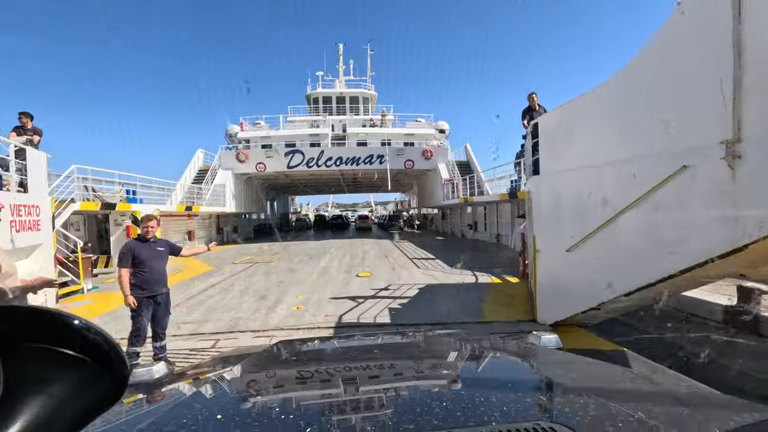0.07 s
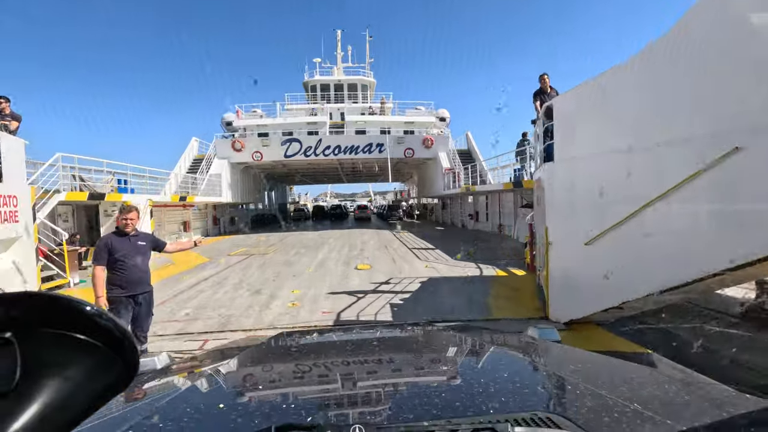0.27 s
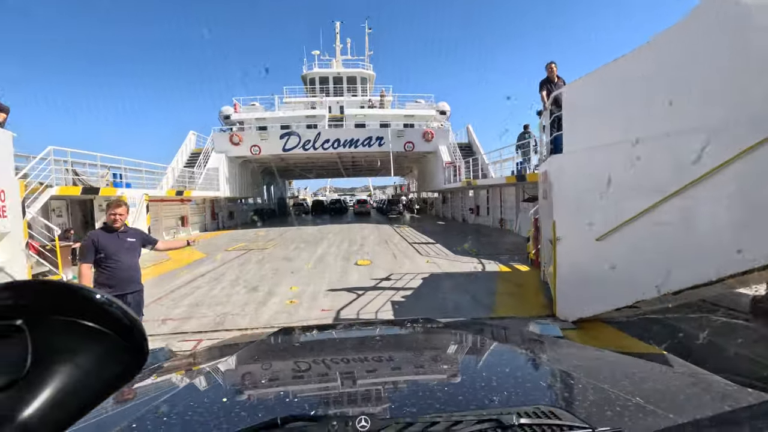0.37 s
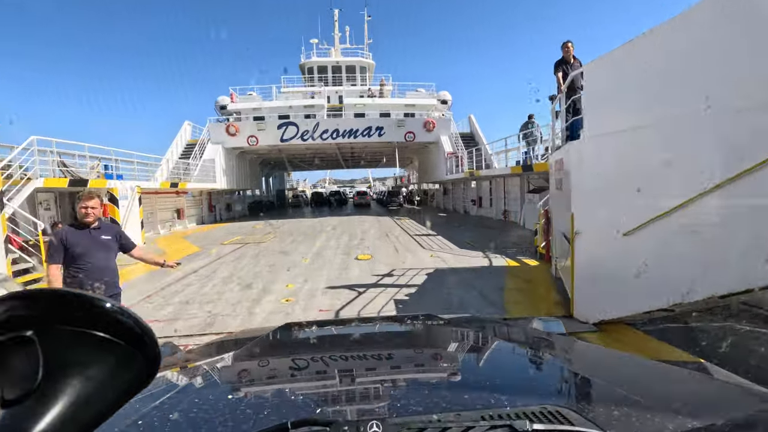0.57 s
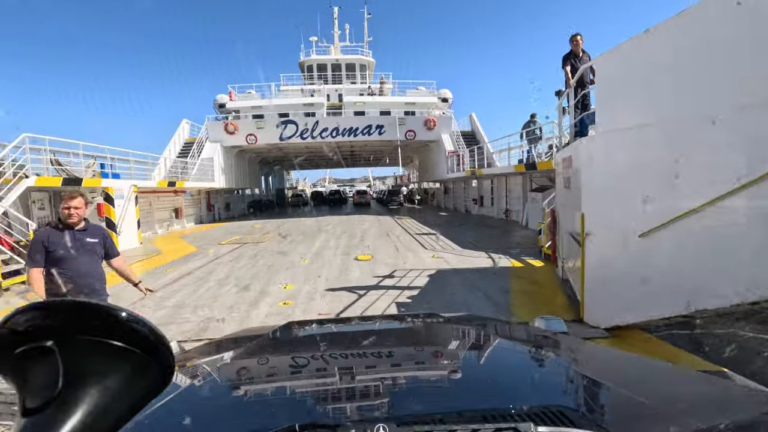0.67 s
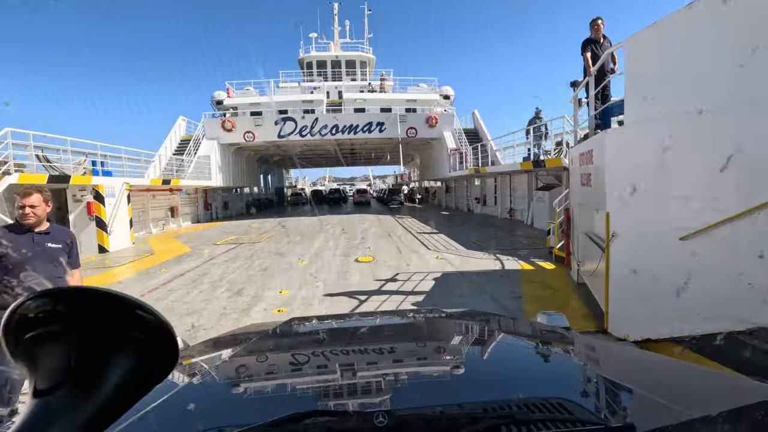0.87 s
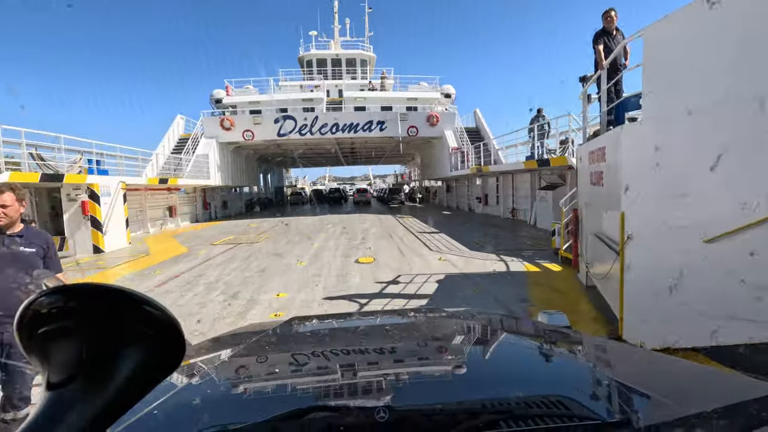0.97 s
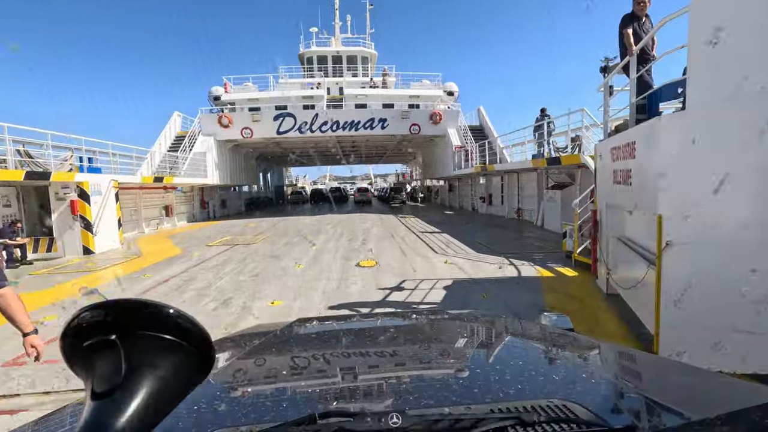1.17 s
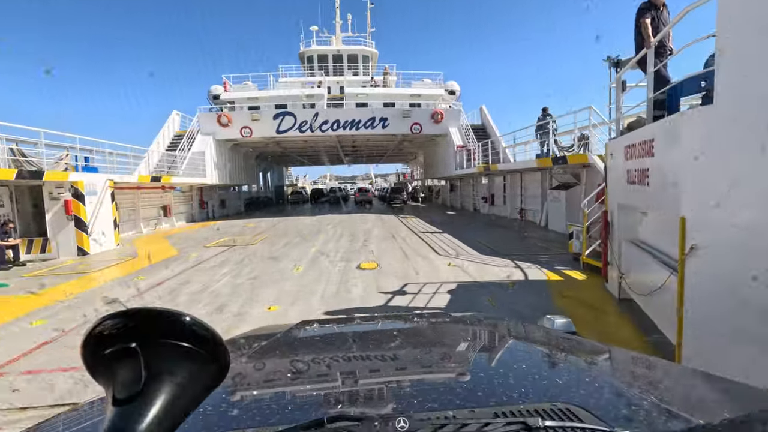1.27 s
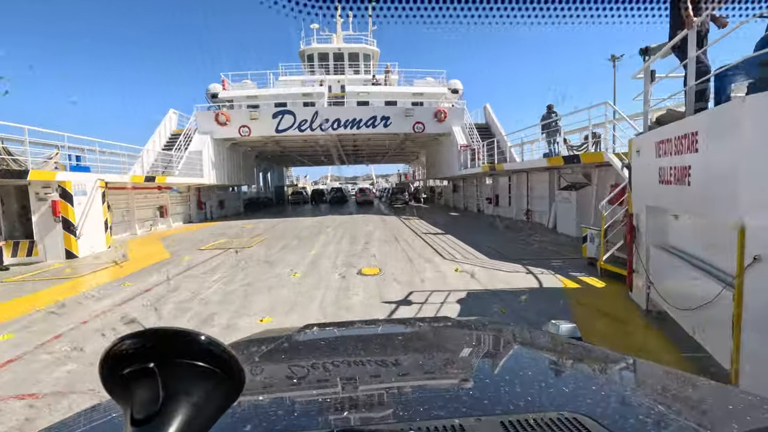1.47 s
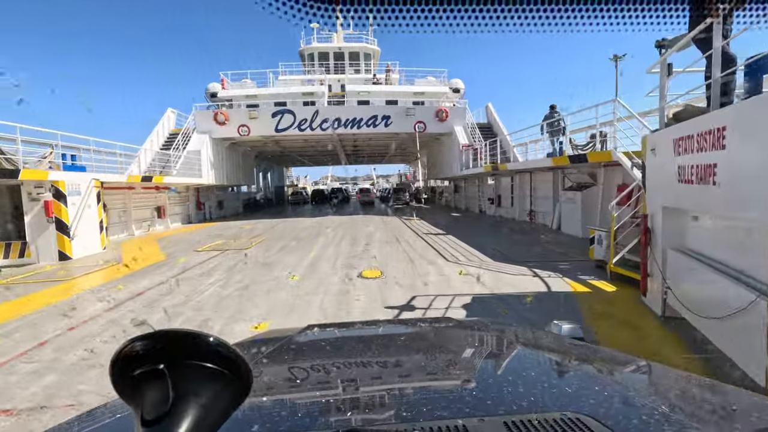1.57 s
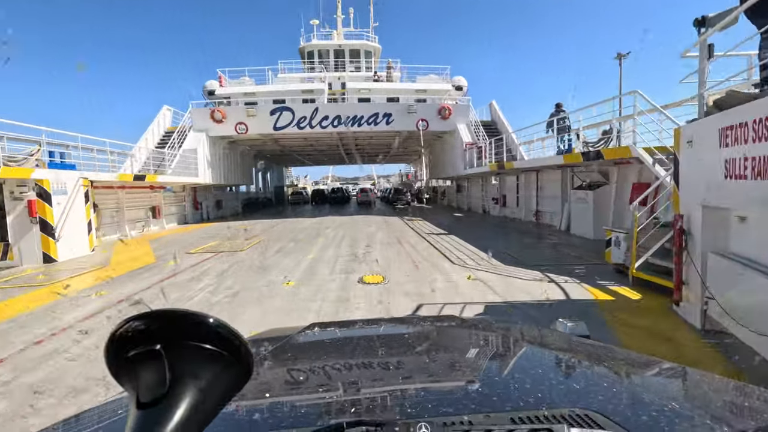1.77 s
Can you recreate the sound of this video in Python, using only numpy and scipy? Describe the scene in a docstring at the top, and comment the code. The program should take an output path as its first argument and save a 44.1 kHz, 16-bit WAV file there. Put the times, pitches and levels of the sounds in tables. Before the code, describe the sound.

Loud metallic bang of a vehicle's tyre on a steel ramp, ringing out above low engine rumble

```python
"""A wheel slams a ferry's steel ramp, which booms and rings: sharp plate modes over dense noise.
A loose flap clanks, the hollow deck drones and small loose parts jingle, all as decaying sounds.
They belong to a big four-wheel-drive crawling aboard, heard from just above its bonnet.
Its engine rumbles throughout as low tones and throbbing noise; its clatter of rough noise,
ticks and squeaks grows as the ferry's steel side wall comes alongside."""
import sys
import numpy as np
from scipy import signal
from scipy.fft import rfft, irfft, next_fast_len
from scipy.io import wavfile
from scipy.ndimage import map_coordinates

SR = 44100
rng = np.random.default_rng(int(sys.argv[2]) if len(sys.argv) > 2 else 0)


def output_pcm(signal):
    """Save a mono or channel-first signal as 16-bit PCM at the path in sys.argv[1].

    Samples are clipped to [-1, 1] before scaling.
    """
    pcm = np.clip(np.atleast_2d(signal).T, -1, 1) * 32767
    wavfile.write(sys.argv[1], SR, np.round(pcm).astype(np.int16))


N = 79380  # samples, 1.8 s


def amp(db):
    """Turn decibels into a gain."""
    return 10 ** (np.asarray(db) / 20)


def unit(x):
    """Scale to an rms of 1."""
    return x / np.sqrt(np.mean(x ** 2) + 1e-20)


def along(points, hz):
    """Read a curve of (Hz, value) points, joined by lines on a log frequency axis."""
    point_hz, values = np.transpose(points)
    return np.interp(np.log(hz + 1), np.log(point_hz + 1), values)


def seconds():
    """Time of every sample."""
    return np.arange(N) / SR


def wobble(rate):
    """A smooth random curve through `rate` random values a second."""
    knots = rng.standard_normal(N // 20)
    return map_coordinates(knots, [seconds() * rate + 2], mode="wrap")


def filtered(x, response):
    """Multiply the spectrum of x by a response that depends on frequency."""
    size = next_fast_len(N + SR // 4)
    hz = np.fft.rfftfreq(size, 1 / SR)
    return irfft(rfft(x, size) * response(hz), size)[:N]


def noise(spectrum):
    """Random noise coloured by a (Hz, dB) curve, at an rms of 1."""
    white = rng.standard_normal(N)
    return unit(filtered(white, lambda hz: amp(along(spectrum, hz))))


def fade(t60):
    """Exponential decay that falls by 60 dB in t60 seconds."""
    return np.exp(-np.log(1000) * seconds() / t60)


def attack(rise_s):
    """A quick rise from 0 towards 1, as a contact takes hold."""
    return 1 - np.exp(-seconds() / rise_s)


def delayed(x, start_s):
    """Make x begin at start_s."""
    return np.pad(x, (max(round(start_s * SR), 0), 0))[:N]


def soften(x, edge_hz, order=2):
    """Low-pass filter: a softer contact loses its treble."""
    sos = signal.butter(order, min(edge_hz, SR / 2 - 1), fs=SR, output="sos")
    return signal.sosfilt(sos, x)


def ring(modes, scatter_db):
    """Decaying modes, each with a new random strength and phase."""
    t, out = seconds(), np.zeros(N)
    for hz, db, t60 in modes:
        level = np.sqrt(2) * amp(db + scatter_db * rng.normal())
        out += level * fade(t60) * np.sin(2 * np.pi * (hz * t + rng.random()))
    return out


RIPPLE_DB, RIPPLE_HZ = 5, 13  # depth and spacing of a plate's weak modes


def weak_modes(count=4000):
    """A plate's irregular fine pattern of resonances, as a (Hz, dB) curve."""
    strength = np.clip(rng.standard_normal(count), -2, 1)
    return np.column_stack([RIPPLE_HZ * np.arange(count), RIPPLE_DB * strength])


def wash(spectrum, decay_times, pattern):
    """Noise for countless plate modes, each frequency band dying at its own speed."""
    steady = unit(filtered(noise(spectrum), lambda hz: amp(along(pattern, hz))))
    hz, t, bands = signal.stft(steady, SR, nperseg=256)
    t60 = along(decay_times, hz)[:, None]
    return signal.istft(bands * np.exp(-np.log(1000) * t / t60), SR, nperseg=256)[1][:N]


def dense_blows(blows, spectrum, decay_times, attack_s):
    """Every blow starts a new wash through one plate's pattern, duller for a softer contact."""
    rise, pattern, out = attack(attack_s), weak_modes(), np.zeros(N)
    for start_s, db, edge_hz in blows:
        burst = soften(rise * wash(spectrum, decay_times, pattern), edge_hz)
        out += delayed(amp(db) * burst, start_s)
    return out


SHIMMER_RAD, SHIMMER_RATE = .22, 24  # phase wander of each mode, random values a second


def struck(modes, blows, attack_s, order=2):
    """Every blow adds energy to modes that ring on; duller blows reach fewer of the high ones."""
    t, out = seconds(), np.zeros(N)
    for hz, db, t60 in modes:
        decay = (attack(attack_s) * fade(t60)) ** 2
        energy = np.zeros(N)
        for start_s, level, edge_hz in blows:
            treble_loss = 1 + (hz / edge_hz) ** (2 * order)
            energy += delayed(decay, start_s) * amp(level) ** 2 / treble_loss
        phase = 2 * np.pi * (hz * t + rng.random()) + SHIMMER_RAD * wobble(SHIMMER_RATE)
        out += amp(db) * np.sqrt(2 * energy) * np.sin(phase)
    return out


# Low engine tones. Each row: multiple of the firing rate, average level in dB.
ORDERS = [(1, -56.5), (2, -37), (3, -39.5), (4, -46.5)]
# Colour of the engine's rumble. Each row: frequency in Hz, relative level in dB.
RUMBLE = [(15, -31), (28, -15), (45, 1), (70, -4), (130, -0.5), (180, -4), (245, -0.5), (300, -5),
          (400, -20), (520, -14.5), (600, -21), (680, -19), (900, -28.5), (1200, -23), (1400, -30.5),
          (2200, -33.5), (3200, -38), (5500, -47.5), (13000, -72)]
FIRING_HZ, SPEED_WANDER, ORDER_WANDER_DB = 39.63, 0.01205, 1  # SPEED_WANDER is a fraction
RUMBLE_DB, RUMBLE_THROB = -31, 0.19  # level, depth of the throb as a fraction
WHINE_HZ, WHINE_DB, WHINE_WANDER = 511, -47.5, 0.02565  # WHINE_WANDER is a fraction


def engine():
    """Low firing tones, a rumble that throbs with them, and a faint drifting whine of a belt pulley."""
    turn = 2 * np.pi * np.cumsum(1 + SPEED_WANDER * wobble(7.17)) / SR
    tones = np.zeros(N)
    for multiple, db in ORDERS:
        level = np.sqrt(2) * amp(db + ORDER_WANDER_DB * wobble(24))
        tones += level * np.sin(multiple * FIRING_HZ * turn + 2 * np.pi * rng.random())
    whine_turn = 2 * np.pi * np.cumsum(1 + WHINE_WANDER * wobble(10)) / SR
    whine = np.sqrt(2) * amp(WHINE_DB) * np.sin(WHINE_HZ * whine_turn)
    throb = 1 + RUMBLE_THROB * np.cos(FIRING_HZ * turn)
    return tones + whine + amp(RUMBLE_DB) * unit(noise(RUMBLE) * throb)


# Colour of the steady clatter. Each row: frequency in Hz, relative level in dB.
CLATTER = [(150, -29), (300, 7), (550, 8), (900, -1.5), (1500, -11), (2400, -10), (3300, -13.5),
           (5500, -22.5), (7500, -29.5), (9000, -47), (13000, -36)]
# Sharp mechanical ticks. Each row: start in seconds, level in dB before the wall acts.
TICKS = [(1.394, -38.5), (1.419, -38), (1.549, -36.5), (1.573, -37), (1.587, -40.5), (1.631, -33.5),
         (1.694, -34), (1.753, -35.5)]
# Colour of one tick. Each row: frequency in Hz, relative level in dB.
TICK = [(400, -3), (1000, 3.5), (1430, 9), (1900, 1), (3500, -7), (6500, -14), (9000, -21), (13000, -33)]
# Squeaks of a dry pivot. Each row: start in seconds, pitch in Hz, level in dB before the wall acts.
CHIRPS = [(1.411, 2170, -36), (1.469, 2170, -33.5), (1.519, 5250, -43), (1.531, 2180, -33.5),
          (1.539, 2130, -32.5), (1.589, 2220, -41), (1.65, 2180, -35), (1.659, 2130, -36),
          (1.707, 2300, -36.5), (1.765, 2080, -36)]
# Engine sound returned by the wall. Each row: time in seconds, gain in dB.
WALL = [(0, -43), (0.101, -6.5), (.9, -6), (1.27, -10.5), (1.4, 0), (1.539, 2), (1.7, 0), (1.8, -1.5)]
CLATTER_DB, CLATTER_ROUGH_DB = -38, 2  # level before the wall acts, size of its fast wander
TICK_T60, TICK_ATTACK_S = .058, .0009  # seconds; the squeaks share this attack
CHIRP_WIDTH_HZ, CHIRP_T60 = 190, 0.043  # distance from the pitch to half gain, decay in seconds


def clatter():
    """Rough mechanical noise, sharp ticks and short squeaks, thrown back by the side wall."""
    out = amp(CLATTER_DB) * unit(noise(CLATTER) * amp(CLATTER_ROUGH_DB * wobble(170)))
    rise = attack(TICK_ATTACK_S)
    for start_s, db in TICKS:
        out += delayed(amp(db) * rise * fade(TICK_T60) * noise(TICK), start_s)
    for start_s, pitch_hz, db in CHIRPS:
        white = rng.standard_normal(N)
        squeak = unit(filtered(white, lambda hz: 1 / (1 + ((hz - pitch_hz) / CHIRP_WIDTH_HZ) ** 2)))
        out += delayed(amp(db) * rise * fade(CHIRP_T60) * squeak, start_s)
    return out * amp(np.interp(seconds(), *np.transpose(WALL)))


# Light rattles of the bodywork. Each row: start in seconds, level in dB before the decay.
RATTLES = [(0.399, -43.5), (0.452, -42)]
# Colour of one rattle. Each row: frequency in Hz, relative level in dB.
RATTLE = [(2500, -14.5), (5000, 2), (7500, -9), (9000, -19), (13000, -24)]


def bodywork(attack_s=0.0082, t60=0.098):
    """Small loose parts jingle as the vehicle rocks: short bursts of bright noise."""
    shape = attack(attack_s) * fade(t60)
    return sum(delayed(amp(db) * noise(RATTLE) * shape, start_s) for start_s, db in RATTLES)


# Knocks of the tyres. Each row: start in seconds, level in dB before the decay.
KNOCKS = [(1.331, -26), (1.392, -28), (1.667, -21)]
# Colour of one knock. Each row: frequency in Hz, relative level in dB.
KNOCK = [(20, -13), (50, 21), (130, 9), (230, -29), (500, -30), (2000, -68.5)]


def suspension(attack_s=0.00092, t60=0.096):
    """Dull knocks as the tyres roll over the deck: short bursts of deep noise."""
    shape = attack(attack_s) * fade(t60)
    return sum(delayed(amp(db) * noise(KNOCK) * shape, start_s) for start_s, db in KNOCKS)


# The ramp's foot bumps on the deck. Each row: start in seconds, relative level in dB.
DECK_BUMPS = [(.474, -19.5), (.53, -24.5), (.576, -21)]
# Strong modes of the deck. Each row: frequency in Hz, relative level in dB, 60 dB decay in seconds.
DECK_MODES = [(199.8, -10, 1.6), (229, -10, 2.12), (256.7, -7.5, 0.79), (283, -10, 1.3), (333, -1, 0.28),
              (361, -4.5, 0.29)]
# Dense weak modes of the deck. Each row: frequency in Hz, relative level in dB.
DECK_WASH = [(60, -16), (300, 10), (520, -1), (700, -4), (1300, -27), (3000, -47.5)]
DECK_WASH_DB, DECK_WASH_T60 = -5, 0.86  # relative level, decay in seconds


def deck(attack_s=0.00043):
    """The hollow deck drones after each bump: ringing modes over fading noise."""
    rise, out = attack(attack_s), np.zeros(N)
    for start_s, db in DECK_BUMPS:
        strong = ring(DECK_MODES, scatter_db=0.5)
        dense = amp(DECK_WASH_DB) * noise(DECK_WASH) * fade(DECK_WASH_T60)
        out += delayed(amp(db) * rise * (strong + dense), start_s)
    return out


# Clanks of the flap. Each row: start in seconds, relative level in dB, dull above this Hz.
CLANKS = [(.001, -42.5, 2230), (.112, -45, 2240), (.315, -28, 2120), (0.481, -24, 7530), (.571, -27, 2250),
          (.607, -31.5, 3000), (.679, -31, 2250), (.802, -39, 2100), (0.986, -50, 2330), (1.029, -49, 2300)]
# Strong modes of the flap. Each row: frequency in Hz, relative level in dB, 60 dB decay in seconds.
FLAP_MODES = [(1668, -4, .3), (1695, -3, .42), (1927, -2, .28), (2078, 3, .18), (2148, 0, .23),
              (2340, -6, .2), (2510, -3, .2), (2929, -3, .16), (3811, -10, .22), (4264, -3, .12),
              (4554, -1, .12), (4985, -1, .2)]
# Its dense weak modes. Each row: frequency in Hz, relative level in dB.
FLAP_WASH = [(100, -55), (400, -2.5), (1200, -9.5), (1700, 2), (2300, -6.5), (3400, -14.5), (4700, -14.5),
             (7000, -22.5), (8500, -53), (13000, -65)]
# How long those ring. Each row: frequency in Hz, 60 dB decay in seconds.
FLAP_T60 = [(1700, .25), (3000, .2), (7000, .18)]
FLAP_ATTACK_S, FLAP_MODES_DB, FLAP_WASH_DB = .003, -7.5, 5


def flap():
    """A loose steel flap taps lightly, strikes hard, then rocks and settles."""
    strong = struck(FLAP_MODES, CLANKS, FLAP_ATTACK_S, order=3)
    dense = dense_blows(CLANKS, FLAP_WASH, FLAP_T60, FLAP_ATTACK_S)
    return amp(FLAP_MODES_DB) * strong + amp(FLAP_WASH_DB) * dense


# Plate damped under the tyre. Each row: frequency in Hz, level in dB, 60 dB decay in seconds.
THUD_MODES = [(151.3, -20.5, 0.44), (251.2, -8, 0.12), (327, -16.5, 0.23), (454, -27, 0.035)]
# Colour of the first contact. Each row: frequency in Hz, relative level in dB.
THUD = [(40, -43), (90, -41), (150, -22), (260, 13.5), (420, 10), (600, -19), (900, 4), (1500, -20),
        (2900, -24.5), (4000, -29), (9000, -52)]
# Colour of steel meeting steel. Each row: frequency in Hz, relative level in dB.
CRACK = [(300, -38), (800, 5), (1500, 6.5), (2900, 3.5), (3800, -10), (8000, -39), (13000, -58)]
THUD_S, THUD_DB, THUD_T60 = .229, 1, 0.069  # start in seconds, noise level, decay in seconds
CRACK_DB, CRACK_T60 = -13, 0.057  # level before the decay, decay in seconds


def tyre_thud(attack_s=0.004, crack_attack_s=0.00032):
    """The wheel drops on the plate: a crack and a short, heavy push."""
    t, push = seconds(), np.zeros(N)
    for hz, db, t60 in THUD_MODES:
        push += np.sqrt(2) * amp(db) * fade(t60) * np.sin(2 * np.pi * hz * t)
    thud = attack(attack_s) * (push + amp(THUD_DB) * noise(THUD) * fade(THUD_T60))
    crack = amp(CRACK_DB) * noise(CRACK) * fade(CRACK_T60) * attack(crack_attack_s)
    return delayed(thud + crack, THUD_S)


# Wheel blows on the ramp. Each row: start in seconds, relative level in dB, dull above this Hz.
BLOWS = [(0.203, -27, 3300), (.219, -26, 6700), (.229, -17, 6030), (.239, -19, 7900), (.275, -21.5, 3880),
         (0.295, -21, 1500), (0.626, -29.5, 1190)]
# Strong modes of the ramp. Each row: frequency in Hz, relative level in dB, 60 dB decay in seconds.
RAMP_MODES = [(141, -8, .6), (212, -3, 1.1), (273, -1, .95), (335, -7, .6), (388, -2.5, .65),
              (429, -4, .35), (484, 3, .55), (564, -4.5, 1), (716, -10, .7), (1044, -12, .55),
              (1206, -14, .8), (1685, -14.5, 1.1), (1738, -14, .65), (2024, -17, .65), (2772, -19, .7),
              (3004, -19, .85), (4989, -29, .65)]
# Its dense weak modes. Each row: frequency in Hz, relative level in dB.
RAMP_WASH = [(40, -62.5), (90, -11.5), (135, -5.5), (180, -11.5), (270, -1), (480, -4), (640, -10.5),
             (900, -12), (1300, -21.5), (1720, -18), (2350, -28), (2900, -21.5), (3500, -35.5),
             (5200, -34.5), (7500, -45), (13000, -51.5)]
# How long those ring. Each row: frequency in Hz, 60 dB decay in seconds.
RAMP_T60 = [(120, 1), (260, 0.92), (700, 0.48), (1800, 0.94), (5000, 0.74), (11000, 0.24)]
RAMP_MODES_DB, RAMP_WASH_DB = -5.5, 2


def ramp(attack_s=0.00033):
    """The steel plate rebounds and booms at each contact: ringing modes over a dense wash."""
    strong = struck(RAMP_MODES, BLOWS, attack_s)
    dense = dense_blows(BLOWS, RAMP_WASH, RAMP_T60, attack_s)
    return amp(RAMP_MODES_DB) * strong + amp(RAMP_WASH_DB) * dense


def scene():
    """Vehicle, deck, flap and ramp at one microphone."""
    vehicle = engine() + clatter() + bodywork() + suspension()
    steel = deck() + flap() + tyre_thud() + ramp()
    return (vehicle + steel)[None]


TOP_HZ = 13000  # upper band limit


def record(dry):
    """The recorder rounds off the highest peaks and has a treble notch and a steep band limit."""
    rounded = dry[0] / (1 + (dry[0] / .9) ** 6) ** (1 / 6)  # peaks stay below 0.9
    # Each row: frequency in Hz, gain in dB.
    notch = [(7500, -2.5), (8900, -11), (10200, -3.0)]
    return filtered(rounded, lambda hz: amp(along(notch, hz)) / (1 + (hz / TOP_HZ) ** 80))[None]


dry = scene()
out = record(dry)
output_pcm(out)
```